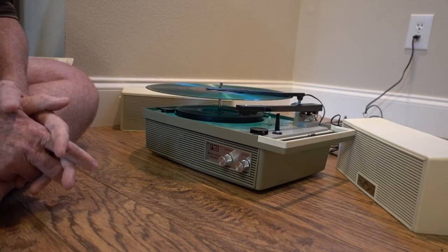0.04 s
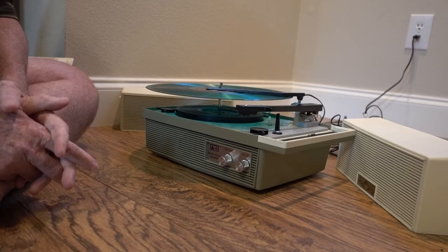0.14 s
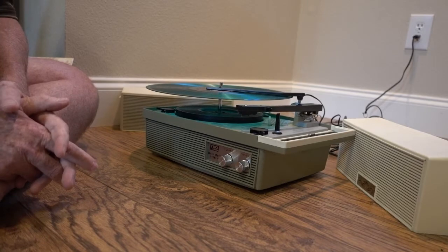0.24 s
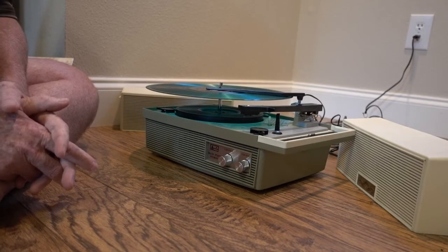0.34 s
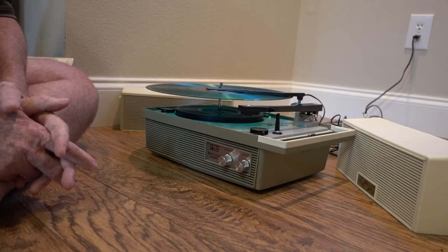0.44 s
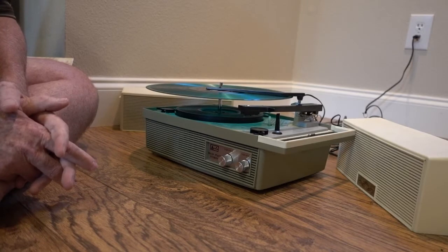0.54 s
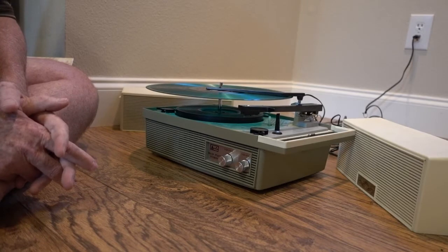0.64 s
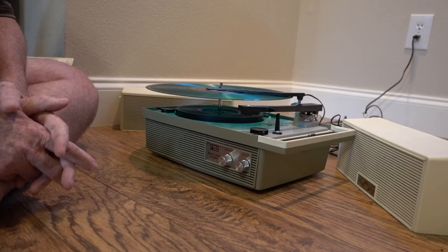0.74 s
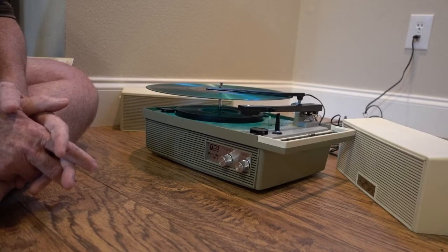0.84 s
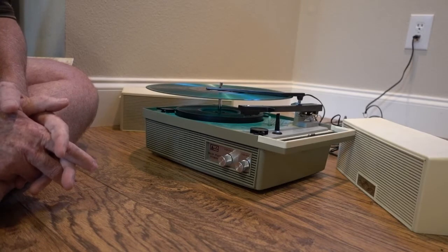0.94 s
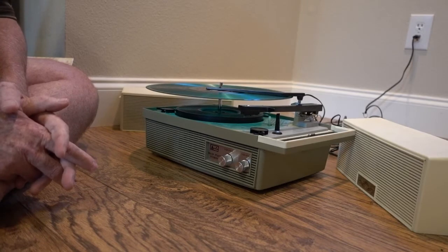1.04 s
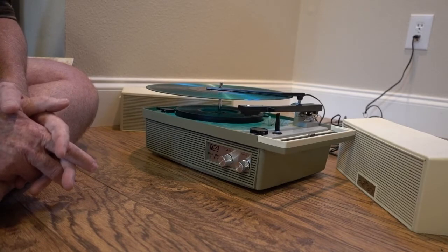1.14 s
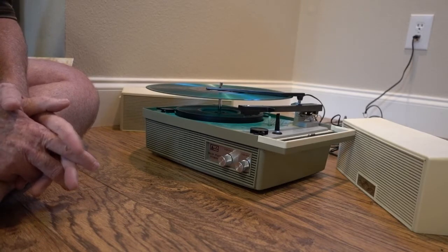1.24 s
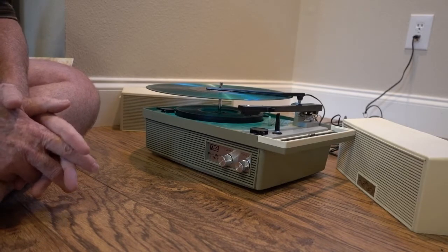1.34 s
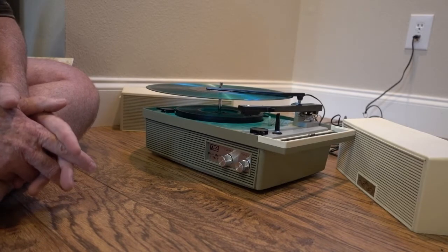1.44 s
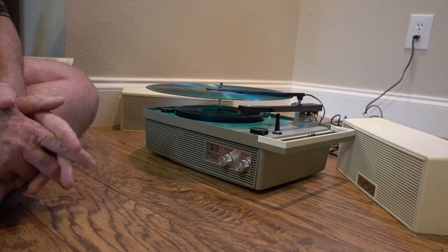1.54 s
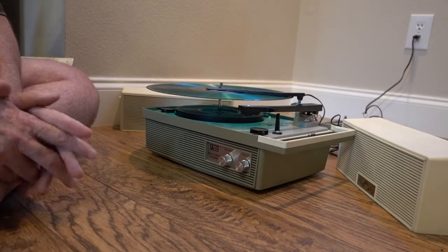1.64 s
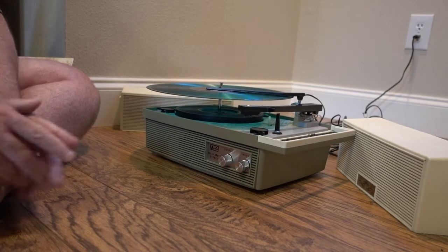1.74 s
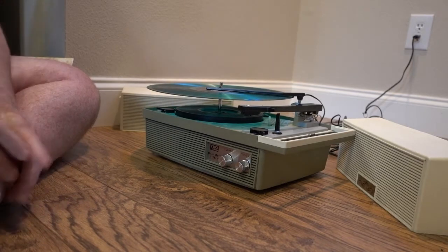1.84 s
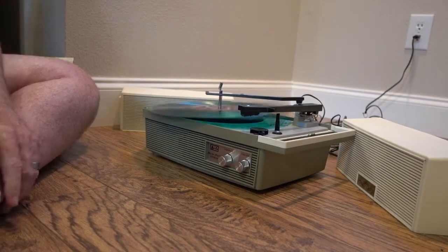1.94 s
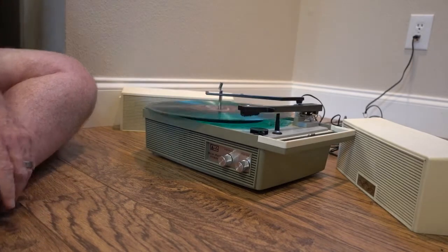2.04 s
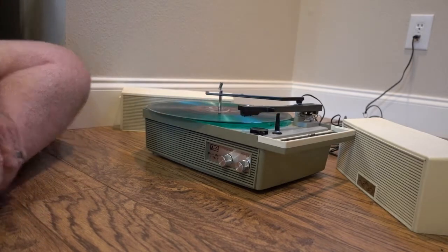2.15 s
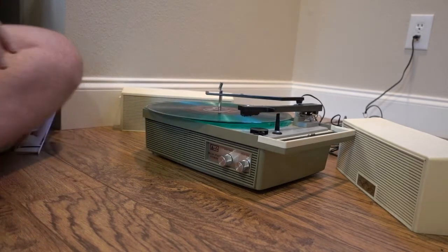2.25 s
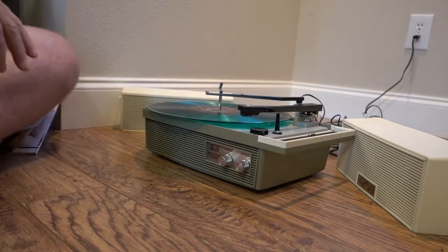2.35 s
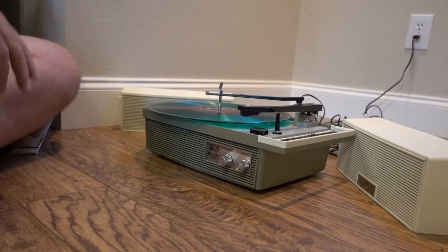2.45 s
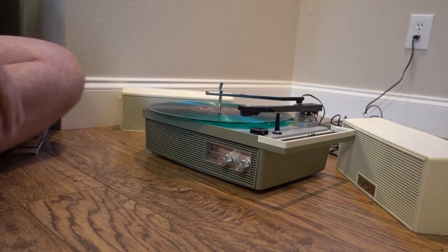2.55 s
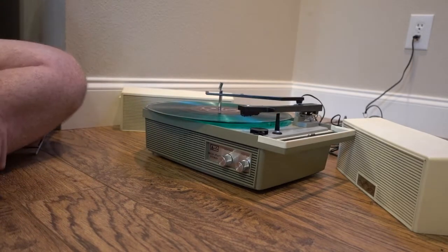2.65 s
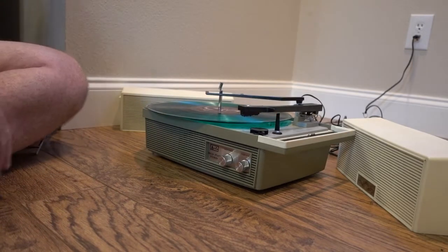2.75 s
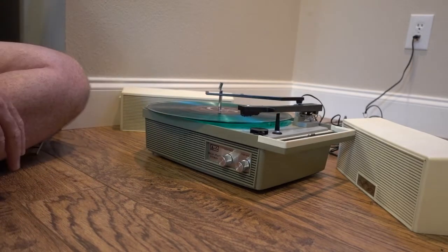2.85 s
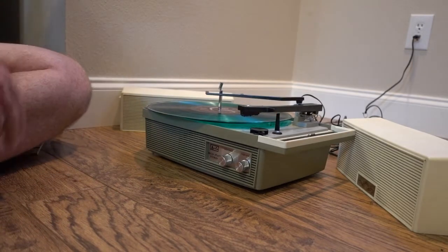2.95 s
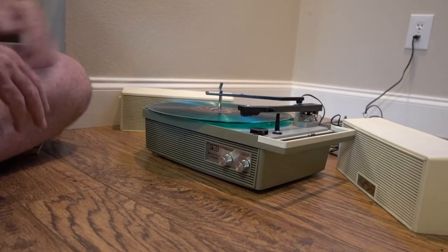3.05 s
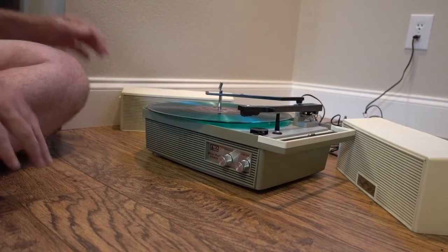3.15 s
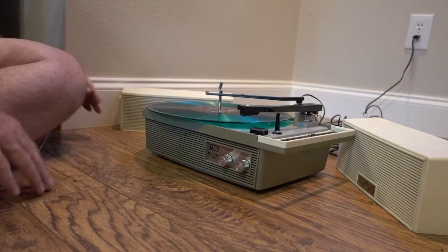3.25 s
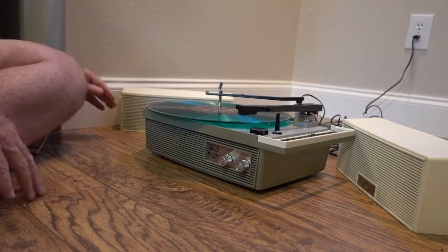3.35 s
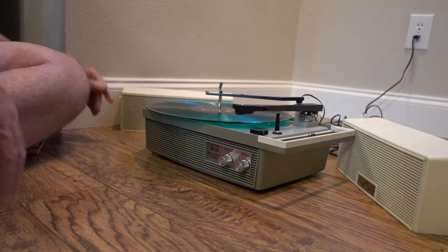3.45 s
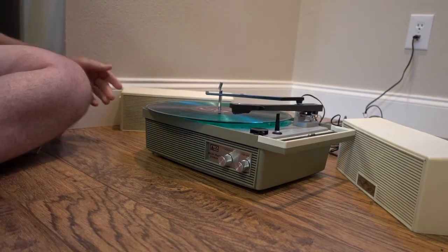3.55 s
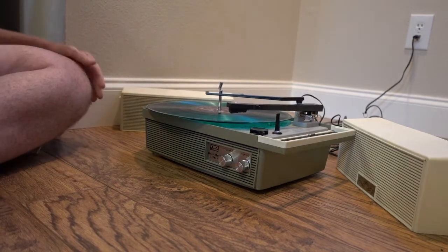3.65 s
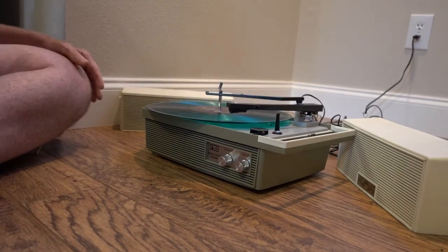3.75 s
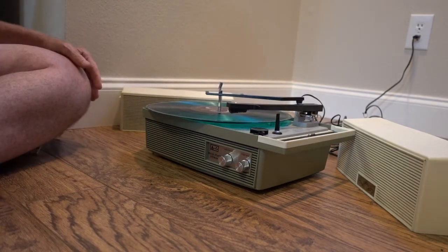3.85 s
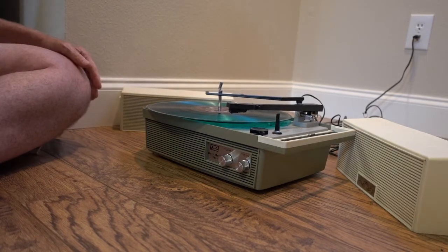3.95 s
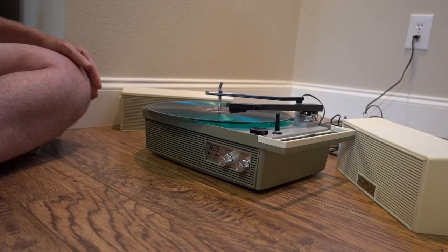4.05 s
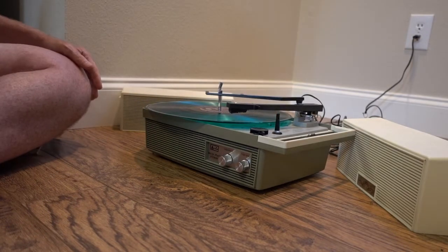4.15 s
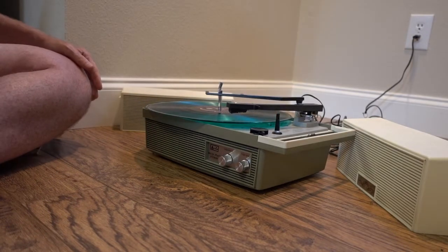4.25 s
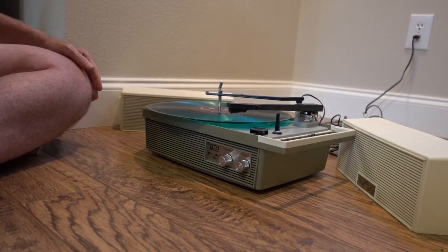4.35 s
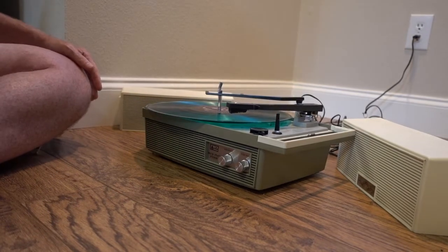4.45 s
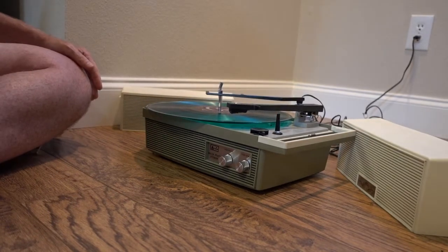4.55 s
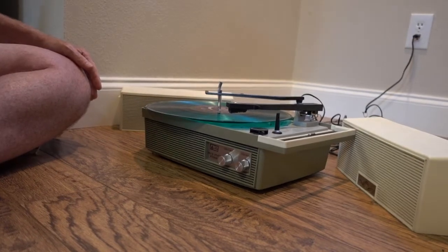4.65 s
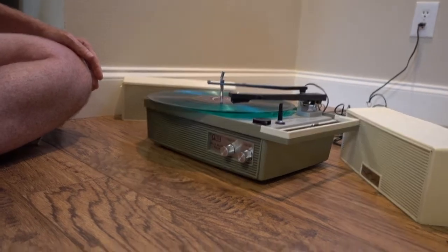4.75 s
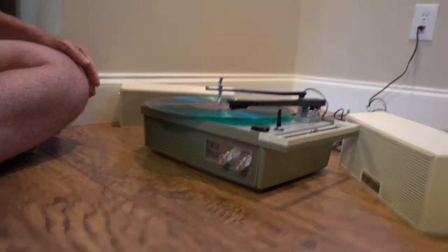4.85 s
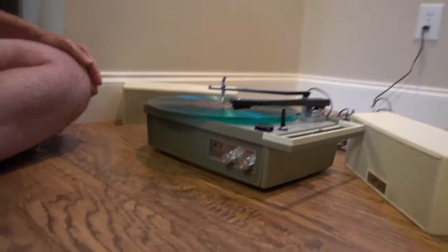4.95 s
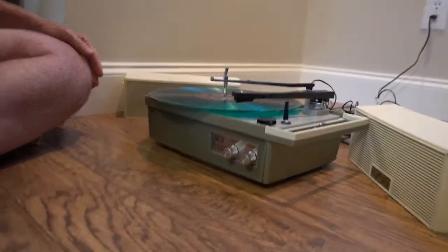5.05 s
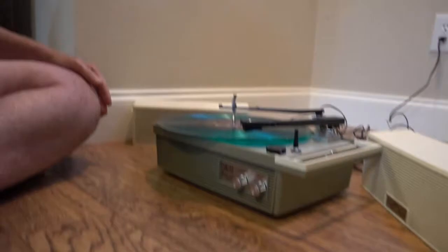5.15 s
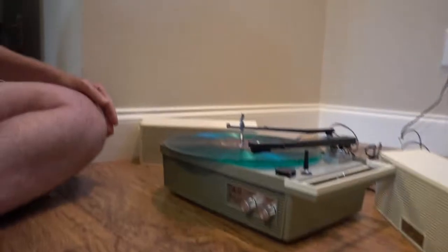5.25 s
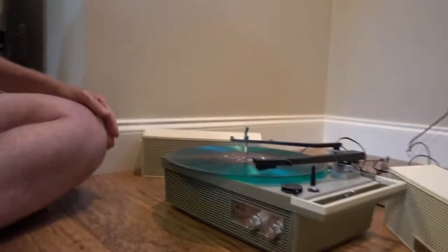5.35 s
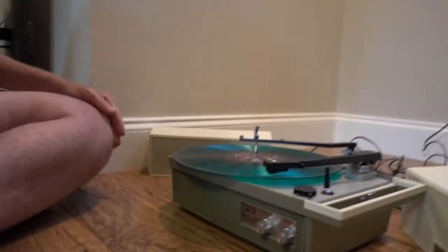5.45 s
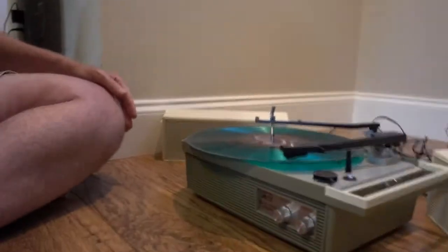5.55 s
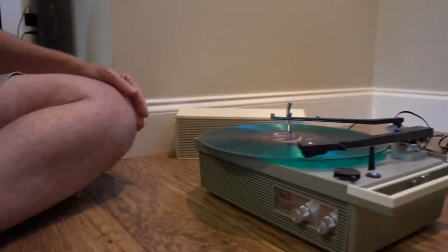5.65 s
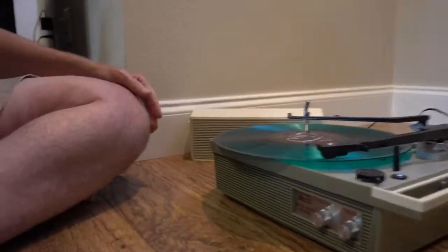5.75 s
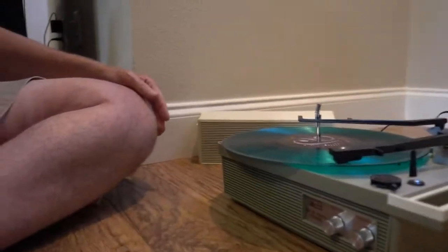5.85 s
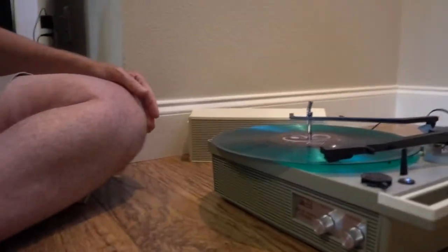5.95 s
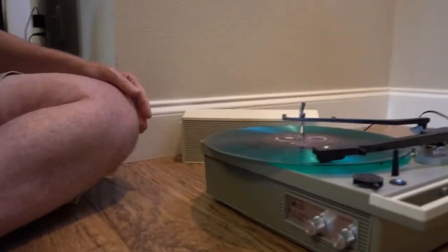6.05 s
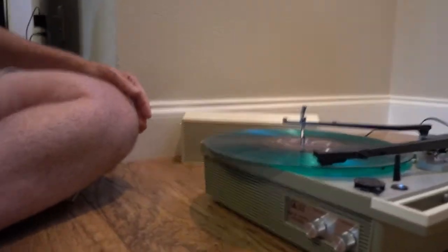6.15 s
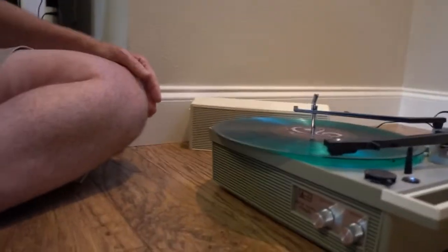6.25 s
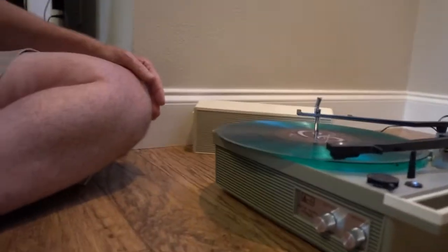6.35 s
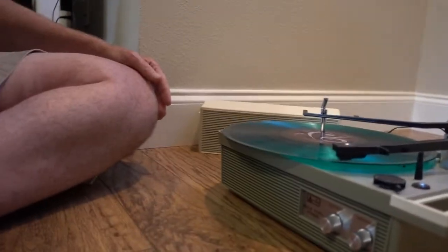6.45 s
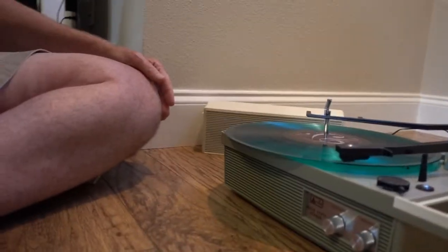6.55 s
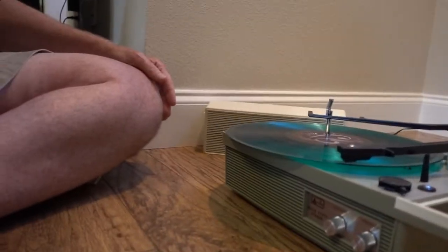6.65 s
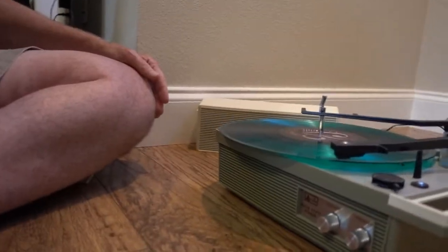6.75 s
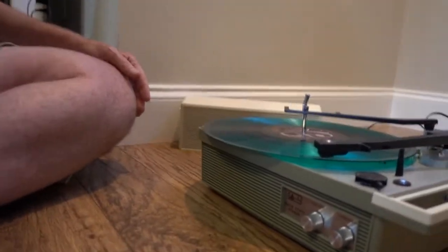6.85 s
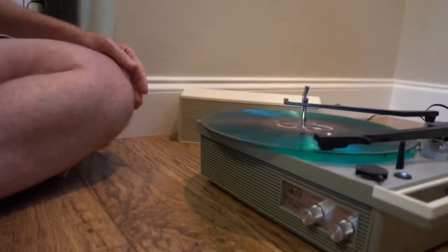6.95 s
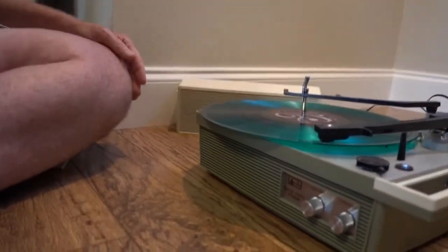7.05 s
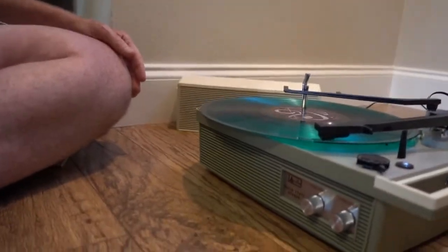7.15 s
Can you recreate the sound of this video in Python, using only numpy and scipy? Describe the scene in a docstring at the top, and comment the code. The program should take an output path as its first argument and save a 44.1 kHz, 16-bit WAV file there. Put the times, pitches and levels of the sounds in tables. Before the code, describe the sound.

Close in a bare room corner, a portable record changer hums very faintly and ticks. Near two seconds a disc slips and slaps the platter in a loud, bouncing clatter with a metallic deck ring. Someone shifts on the wooden floor with soft rustle and low thuds; dull handling knocks hit the camera as the gears grind a little louder. A hard steel lever clunk follows, then quiet motor noise.

```python
"""A portable record changer cycles on a wooden floor: its catches tick, a disc scrapes down the spindle and
clatters onto the platter, and later the lever snaps home with a clunk. Each blow layers struck modes and decaying
coloured noise; hum, gear noise and a soft regular bump make the motor. Someone shifts on the floor and fingers
knock the hand-held camera. A bare room corner answers with a short diffuse tail; the sound is all but mono."""
import sys
import numpy as np
from scipy import signal
from scipy.fft import rfft, irfft, next_fast_len
from scipy.io import wavfile
from scipy.ndimage import map_coordinates

SR = 44100
rng = np.random.default_rng(int(sys.argv[2]) if len(sys.argv) > 2 else 0)


def persist_wave(psi):
    """Save psi, clipped to +-1, as 16-bit WAV."""
    counts = np.round(np.clip(psi, -1, 1) * 32767).astype(np.int16)
    wavfile.write(sys.argv[1], SR, np.atleast_2d(counts).T)


N = 317368
TIME = np.arange(N) / SR  # s since the start of the scene
AGE = np.arange(SR * 3 // 4) / SR  # s since a blow

# Spectra give a relative shape only: noise() brings each to rms 1.
# modes of the sprung steel deck: f/Hz, relative level/dB, t60/s
DECK_MODES = [(795, -11.5, 0.39), (983, -4.5, 0.51), (1074.4, -7, 0.19), (1297, -4.5, 0.52),
              (1367, -6, 0.23), (1529, -5.5, 0.32), (1718, -1.5, 0.46), (1791, 0.5, 0.15), (1879, -4, 0.4),
              (1946, -5, 0.084), (2200, -2, 0.18), (2130, -7, 0.25), (2450, -5, 0.21), (2716, -7.5, 0.22),
              (3150, -15, .1), (3100, -15.5, 0.092), (4030, -10.5, 0.17), (5950, -13, .14)]
# modes of the case under the deck: f/Hz, relative level/dB, t60/s
CASE_MODES = [(137, -8.5, 0.2996), (172, 8, 0.14), (201, -4.5, .35), (261.4, 0.5, 0.44), (333.7, 4.5, 0.41),
              (420, 0.5, 0.23), (575, -2, .35)]
# spectrum of vinyl on the platter: f/Hz, level/dB per Hz
CLACK_SPECTRUM = [(240, -34), (400, -8), (563, -2.5), (850, -10.5), (995, -11.5), (1500, -6.5), (1780, -5),
                  (2000, -10.5), (2180, -2.5), (2810, -9.5), (3380, -7.5), (4620, -13), (5410, -11.5),
                  (12000, -31.5), (15600, -62.5), (22000, -120)]
# spectrum of the bright edge of a hard contact: f/Hz, level/dB per Hz
SNAP_SPECTRUM = [(2500, -33.5), (5000, 0), (7000, 0.5), (10000, -2), (13500, -7.5)]
# spectrum of the case's short thump: f/Hz, level/dB per Hz
TAP_SPECTRUM = [(120, -17), (200, -5), (400, 4.5), (620, -7), (850, -6.5), (1200, -34.5)]
# spectrum of a soft pat: f/Hz, level/dB per Hz
PAT_SPECTRUM = [(90, -36), (170, 8), (350, 6.5), (750, 3.5), (1300, -6), (2200, -18), (6000, -74),
                (13000, -52)]
# spectrum of the low push under a heavy blow: f/Hz, level/dB per Hz
PUSH_SPECTRUM = [(30, -6.5), (50, 4.5), (90, -9.5), (120, -6), (170, 6), (250, 0.5), (330, -14.5),
                 (600, -44)]


def amp(db):
    """Decibels to gain."""
    return 10 ** (np.asarray(db) / 20)


def unit(x):
    """Scale to rms 1."""
    return x / np.sqrt(np.mean(x ** 2) + 1e-20)


def along(points, hz):
    """Read (Hz, value) points on a log frequency axis."""
    f, v = np.transpose(points)
    return np.interp(np.log(hz + 1), np.log(f + 1), v)


def wobble(rate):
    """A smooth random curve with rate knots a second."""
    knots = rng.standard_normal(int(N * rate / SR) + 4)
    return map_coordinates(knots, [TIME * rate])


def noise(spectrum, size=len(AGE)):
    """Coloured noise of rms 1: white noise shaped bin by bin."""
    m = next_fast_len(size)
    shape = amp(along(spectrum, np.fft.rfftfreq(m, 1 / SR)))
    white = rng.standard_normal(m)
    return unit(irfft(rfft(white) * shape, m)[:size])


def fade(t60, t=AGE):
    """Free decay, 60 dB down after t60 seconds."""
    return np.exp(-np.log(1000) * t / np.maximum(t60, 1e-3))


def burst(spectrum, t60):
    """Many close resonances struck at once, as decaying coloured noise."""
    return noise(spectrum) * fade(t60)


def ring(modes, scatter_db, buzz=0.014):
    """Struck modes of total strength 1, shared out anew at every blow; loose joints blur each by the share buzz."""
    hz, db, t60 = np.transpose(modes)[:, :, None]
    gain = amp(db + scatter_db * rng.standard_normal(hz.shape))
    gain = gain * rng.choice([-1, 1], hz.shape)
    walk = np.cumsum(rng.standard_normal(len(AGE)))
    drift = np.sqrt(2 * np.pi * buzz * hz / SR) * walk  # random phase widens each mode
    partials = gain * np.sin(2 * np.pi * hz * AGE + drift) * fade(t60)
    return np.sum(partials, axis=0) / np.linalg.norm(gain)


def swell(rise_s):
    """A heavy or softly struck part takes a moment to get moving."""
    return 1 - np.exp(-AGE / rise_s)


def stroke(start_s, end_s, rise_s, release_s):
    """Gain that rises to 1 at the start, holds to the end and falls away; 20 dB per rise or release time."""
    early = np.maximum(start_s - TIME, 0)
    late = np.maximum(TIME - end_s, 0)
    return amp(-20 * (early / rise_s + late / release_s))


def soften(x, cut_hz):
    """A soft contact excites little above its cut-off."""
    return signal.sosfilt(signal.butter(2, cut_hz, fs=SR, output="sos"), x)


def edge_of(contact_hz):
    """The harder the contact, the stronger its bright edge, in dB relative to a 10 kHz contact."""
    db_per_octave = 14.5
    return db_per_octave * np.log2(contact_hz / 10000)


def in_room(x, wet_db):
    """The sound and a diffuse tail in which the extreme treble dies first."""
    # decay of the bare corner: f/Hz, t60/s
    decay = [(100, 0.62), (400, 0.7), (1000, 0.65), (2000, 0.59), (5000, 0.59), (12000, 0.37)]
    # what the walls return: f/Hz, relative level/dB
    returns = [(100, -4.5), (500, -1.5), (1900, 3), (3000, -1.5), (6000, 1), (13000, -3.5)]
    hz, t, z = signal.stft(rng.standard_normal(SR), SR, nperseg=256)
    z = z * fade(along(decay, hz)[:, None], t) * amp(along(returns, hz))[:, None]
    tail = signal.istft(z, SR, nperseg=256)[1]
    tail *= 1 - np.exp(-np.arange(len(tail)) / SR / 0.0049)  # echoes take a moment to build up
    out = amp(wet_db) * signal.fftconvolve(x, tail / np.linalg.norm(tail))
    out[:len(x)] += x
    return out


def add(track, s, x):
    """Mix x into the track at s seconds."""
    part = track[round(s * SR):][:len(x)]
    part += x[:len(part)]


def room_air():
    """Steady room rumble and hiss as coloured noise."""
    # f/Hz, level/dB per Hz
    air_spectrum = [(12, -34), (20, -4), (49, -0.5), (148, -12.5), (179, -12), (206, -19.5), (249, -13.5),
                    (302, -18.5), (443, -22.5), (809, -28), (879, -27.5), (1520, -33), (2930, -36.5),
                    (12900, -42.5), (14000, -54.5)]
    return amp(-57.0) * noise(air_spectrum, size=N)


def side_hiss():
    """A faint hiss that sets the two channels apart."""
    return amp(-74.5) * noise([(50, 7.0), (500, 6.0), (13000, -2.5)], size=N)


def motor(first_s=0.103, period_s=0.5, width_s=0.044):
    """Wavering hum tones and fluttering gear noise, with a soft low bump that comes round regularly."""
    # hum tones, wavering about their level: f/Hz, rms level/dB
    hum_tones = [(60, -71), (120, -76), (177.6, -76.5), (446.8, -83)]
    # spectrum of the gear train: f/Hz, level/dB per Hz
    gear_spectrum = [(120, -40.5), (200, -15.5), (308, -9.5), (382, 1), (486, -12.5), (880, -5),
                     (1050, -14), (1750, -14), (3000, -20.5), (5000, -29), (6500, -52.5), (11000, -120)]
    # spells in which the gears work harder: start t/s, end t/s, level/dB before the trim below
    loads = [(3.4, 3.5, -63.5), (5.3, 6.801, -65.5)]
    idle_db, trim_db = -73, -2.5  # gears running free, before the trim; trim of all gear noise
    rise_s, release_s = 0.7, 0.57  # a load comes and goes by 20 dB in these times

    hum = np.zeros(N)
    for hz, db in hum_tones:
        level = amp(db + 2 * wobble(2.8)) * np.sqrt(2)
        hum += level * np.sin(2 * np.pi * hz * TIME + 0.37 * wobble(2.1))

    flutter = amp(1.5 * wobble(18))
    load = np.zeros(N)
    for start_s, end_s, db in loads:
        load += amp(db) * stroke(start_s, end_s, rise_s, release_s)
    effort = np.hypot(amp(idle_db), load)
    gears = amp(trim_db) * effort * unit(noise(gear_spectrum, size=N) * flutter)

    from_bump = (TIME - first_s + period_s / 2) % period_s - period_s / 2  # s to the nearest bump
    bump = np.exp(-(from_bump / width_s) ** 4)
    return hum + gears + amp(-42.0) * bump


def knocks():
    """Fingers bump the camera's shell and soon damp it; a hard bump also jolts the whole body."""
    # dull knocks on the camera: t/s, level/dB, hardness/dB, time until the finger damps it/s
    bumps = [(0.166, -49, -3, 0.015), (2.533, -51, 0, .015), (2.981, -36.5, -9.5, 0.096),
             (4.420, -50, -20, 0.029), (4.583, -39.5, -9, 0.022), (4.919, -25, -15, 0.06),
             (5.760, -37, -4, 0.016), (5.785, -28.5, -4, 0.014), (5.803, -32, -20.5, 0.029),
             (5.902, -36, -27, 0.015), (5.976, -34, -32, 0.014), (6.029, -42, -12, 0.016),
             (6.838, -31.5, -18, 0.012), (6.847, -32.5, -21.5, 0.033)]
    # modes of the shell: f/Hz, relative level/dB, t60/s
    shell_modes = [(331.4, 4, 0.13), (416, -8.5, 0.31), (466.7, -5.5, 0.22), (640, -10, 0.038)]
    out = np.zeros(N)
    for s, db, hard_db, hold_s in bumps:
        damping = np.exp(-(AGE / hold_s) ** 4)
        shell = amp(-1.5) * ring(shell_modes, scatter_db=1.5, buzz=0.0035)
        shell += amp(-20.5) * burst(TAP_SPECTRUM, t60=0.48)
        jolt = amp(hard_db - 13.5) * burst(PUSH_SPECTRUM, t60=0.16)
        pat = amp(hard_db - 3.5) * burst(PAT_SPECTRUM, t60=0.093)
        body = (shell * damping + jolt) * swell(0.00072)
        add(out, s, amp(db) * in_room(body, wet_db=-13))
        add(out, s, amp(db) * in_room(pat, wet_db=-6.5))
    return out


def ticks():
    """Small catches let go; the softer ones sound woody, the hard ones bright."""
    # light clicks: t/s, level/dB, thump balance/dB, contact cut-off f/Hz, deck ring/dB
    catches = [(0.336, -38.5, -8.5, 1600, -19), (.511, -34.5, -2.5, 2700, -37),
               (.944, -47.5, -6, 1650, -30), (1.248, -46.5, -7, 1450, -30), (1.395, -51, -16, 6000, -13),
               (1.47, -45, -9, 10840, -13), (3.663, -49, -1, 7000, -34), (4.576, -46, 4, 12800, -10.5),
               (4.977, -37.5, -2.5, 10200, -30), (5.170, -36, -14, 7600, -10.5),
               (5.497, -37.5, -5.5, 10900, -27)]
    # spectrum of a catch: f/Hz, level/dB per Hz
    click_spectrum = [(300, -10.5), (550, -11.5), (1100, 3.5), (1800, -6.5), (2200, -9.5), (2900, -7.5),
                      (3400, -4), (4300, -7.5), (7000, -9.5), (13000, -62)]
    out = np.zeros(N)
    for s, db, thump_db, contact_hz, ring_db in catches:
        click = amp(-4) * burst(click_spectrum, t60=0.076)
        click += amp(ring_db) * ring(DECK_MODES, scatter_db=2.0)
        edge = amp(edge_of(contact_hz) - 6) * burst(SNAP_SPECTRUM, t60=0.048)
        body = amp(thump_db + 1) * burst(TAP_SPECTRUM, t60=0.092) * swell(0.0023)
        tick = (soften(click, contact_hz) + edge + body) * swell(0.00035)
        add(out, s, amp(db) * in_room(tick, wet_db=-11.0))
    return out


def sitter():
    """Someone shifts: clothes slide as flickering noise, and weight lands on the boards, which boom briefly."""
    # clothes sliding: t of fastest motion/s, level/dB, 20 dB rise/s, 20 dB release/s, lowest f/Hz
    slides = [(1.732, -54, 0.041, .5, 2196), (2.975, -53.5, 0.21, 0.11, 700),
              (3.241, -52.5, 0.031, 0.22, 700), (3.404, -57, 0.086, 0.17, 1200),
              (3.67, -60.5, 0.12, 0.19, 1000)]
    # a hand and a leg settling on the boards: t/s, level/dB, hardness/dB
    thuds = [(3.242, -36, -8), (3.265, -29.5, -9), (3.294, -25, -5), (3.355, -38.5, -18)]
    # spectra of cloth and of the floorboards: f/Hz, level/dB per Hz
    cloth_spectrum = [(530, -31.5), (900, 2.5), (1230, -1.5), (1830, 0.5), (2390, -6.5), (2740, -6.5),
                      (10600, -15), (13100, -21.5), (14000, -45.5)]
    board_spectrum = [(24, -36), (40, -1), (108, -13), (151, 2), (264, -6.5), (297, -5), (334, -6.5),
                      (412, -7), (900, -34), (1170, -45), (1980, -120)]
    # modes of the floor's joists: f/Hz, relative level/dB, t60/s
    joist_modes = [(165, -1, 1), (181, -1, 0.99), (204.5, 7, 0.4)]
    out = np.zeros(N)
    for s, db, rise_s, release_s, low_hz in slides:
        highpass = signal.butter(2, low_hz, "highpass", fs=SR, output="sos")
        rub = signal.sosfilt(highpass, noise(cloth_spectrum, size=N))
        rub = unit(rub * amp(1.4 * wobble(90)))
        out += amp(db) * stroke(s, s, rise_s, release_s) * rub
    for s, db, hard_db in thuds:
        thud = amp(-6.5) * burst(board_spectrum, t60=0.16)
        thud += amp(hard_db - 4) * burst(PAT_SPECTRUM, t60=0.066)
        boom = amp(-18.0) * ring(joist_modes, scatter_db=1.0)
        add(out, s, amp(db) * in_room(thud + boom, wet_db=-5.0))
    return out


def drop():
    """Each slap of the disc is a sharp clack; the deck rings, the case booms and sinks on its feet."""
    # the disc slaps the platter and bounces: t/s, level/dB, thump balance/dB, contact cut-off f/Hz
    slaps = [(1.898, -37.5, -1.5, 900), (1.912, -27.5, -10, 2000), (1.923, -26.5, -7, 7150),
             (1.956, -26, -10, 3500), (1.975, -18.5, -20, 14000), (1.984, -10.5, -18, 8000),
             (2.009, -2.5, -21, 6500), (2.050, -15, -13.5, 7500), (2.071, -20.5, -6.5, 4000),
             (2.109, -11, -21, 7000), (2.159, -17.5, -13, 4970), (2.278, -12.5, -22.5, 850)]
    out = np.zeros(N)
    for s, db, thump_db, contact_hz in slaps:
        clack = amp(-6) * burst(CLACK_SPECTRUM, t60=0.024)
        clack += amp(-13.0) * burst(CLACK_SPECTRUM, t60=0.075)
        deck = amp(-18.5) * ring(DECK_MODES, scatter_db=6.0)
        edge = amp(edge_of(contact_hz) - 14.5) * burst(SNAP_SPECTRUM, t60=0.054)
        case = amp(thump_db - 7.5) * ring(CASE_MODES, scatter_db=3)
        case += amp(thump_db + 1) * burst(TAP_SPECTRUM, t60=0.11)
        push = amp(-22.5) * burst(PUSH_SPECTRUM, t60=0.17)
        slap = soften(clack + deck, contact_hz) + edge + (case + push) * swell(0.004)
        add(out, s, amp(db) * in_room(slap, wet_db=-9))
    return out


def rattle():
    """The disc scrapes down the spindle and chatters until it lies flat: noise in step with its pressure."""
    # spectrum of the flexing disc: f/Hz, level/dB per Hz
    flex_spectrum = [(20, -3.5), (45, 7.5), (90, -4), (170, -3), (500, 1), (1200, -21.5)]
    slip_s, land_s = 1.905, 2.03  # the disc lets go, and lands
    rise_s, settle_s = 0.17, 0.31  # the scraping builds up and dies down by 20 dB in these times
    chatter = unit(noise(CLACK_SPECTRUM, size=N) * amp(4.4 * wobble(160)))
    # the disc flexes and pushes air
    flap = amp(-2.5) * unit(noise(flex_spectrum, size=N) * amp(3.6 * wobble(40)))
    pressure = (TIME > slip_s) * stroke(land_s, land_s, rise_s, settle_s)
    contact = amp(-34.5) * pressure * (soften(chatter, cut_hz=4000) + flap)
    return in_room(contact, wet_db=-5)[:N]


def lever():
    """Steel strikes steel: a hard crack and a short clank; the heavy case follows a moment later."""
    # the change lever trips, snaps home and rebounds: t/s, level/dB, thump balance/dB, brightness/dB
    blows = [(6.123, -28, 3.5, -10), (6.1359, -7.5, -10.5, -19.5), (6.184, -25, -1.5, 1.5),
             (6.205, -42.5, 13.5, -12), (6.275, -48, 11, -15)]
    # spectrum of the lever: f/Hz, level/dB per Hz
    steel_spectrum = [(200, -31), (450, 1), (750, -16), (1050, 6), (1400, -3), (1850, 0.5), (2300, -4),
                      (2900, -16), (3400, 3), (4000, -3.5), (4800, -8), (6200, -10), (9000, -15),
                      (13000, -21)]
    case_lag_s = 0.0046  # the case moves this long after the lever strikes
    out = np.zeros(N)
    for s, db, thump_db, bright_db in blows:
        crack = amp(-7.0) * burst(steel_spectrum, t60=0.013)
        crack += amp(bright_db - 11.5) * burst(SNAP_SPECTRUM, t60=0.058)
        clank = amp(-11.0) * burst(steel_spectrum, t60=0.078)
        clank += amp(-18.0) * ring(DECK_MODES, scatter_db=1.5)
        case = amp(thump_db - 11.0) * ring(CASE_MODES, scatter_db=8.5)
        case += amp(thump_db - 3.5) * burst(TAP_SPECTRUM, t60=0.11)
        add(out, s, amp(db) * in_room(crack + clank, wet_db=-12))
        add(out, s + case_lag_s, amp(db) * in_room(case * swell(0.0045), wet_db=-17.0))
    return out


def scene():
    """All sources over the room's rumble and hiss; the channels differ only by a faint hiss."""
    mid = room_air() + motor() + knocks() + ticks() + sitter() + drop() + rattle() + lever()
    side = side_hiss()
    return np.array([mid + side, mid - side])


def record(dry):
    """The microphone rounds off the tallest peaks, and the treble above the band limit is removed."""
    overload = 0.75  # amplitude that rounded peaks approach
    top_hz = 13550  # band limit
    held = dry / (1 + (dry / overload) ** 4) ** (1 / 4)
    m = next_fast_len(N + SR // 2)
    above_hz = np.fft.rfftfreq(m, 1 / SR) - top_hz
    keep = amp(-np.clip(above_hz / 15, 0, 100))  # 1 dB lost per 15 Hz, down to -100 dB
    return irfft(rfft(held, m) * keep, m)[:, :N]


dry = scene()
out = record(dry)
persist_wave(out)
```